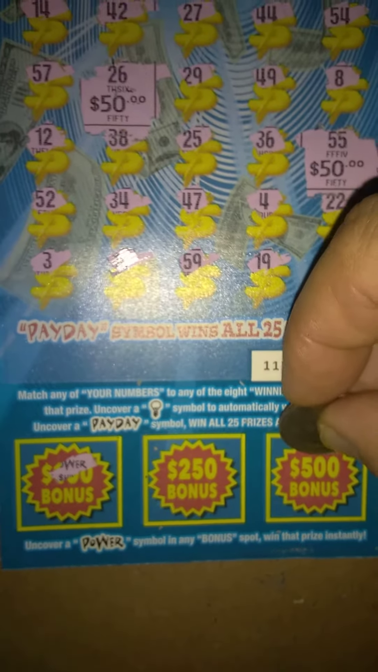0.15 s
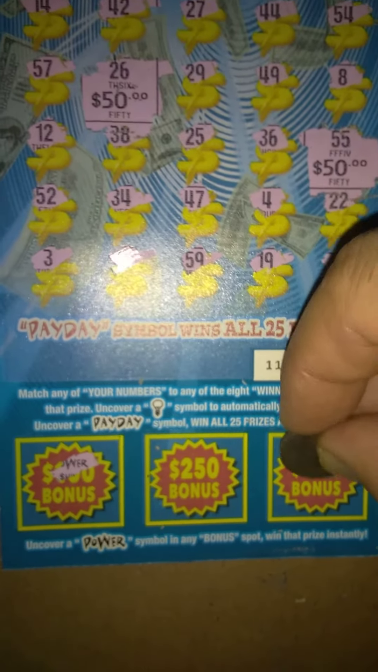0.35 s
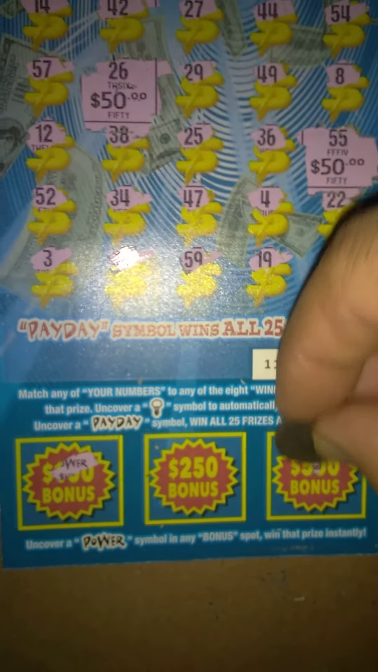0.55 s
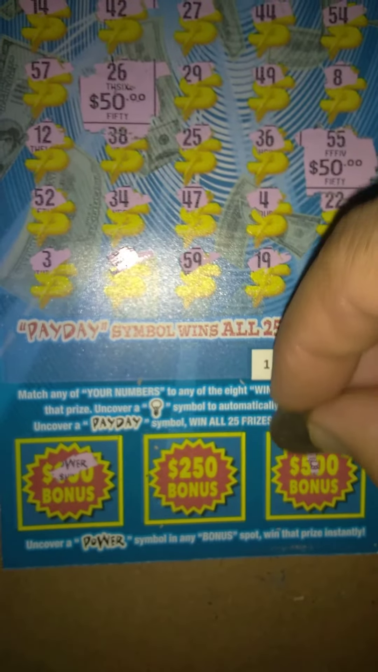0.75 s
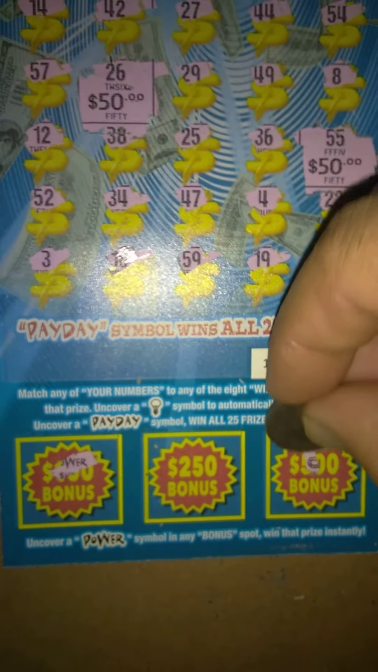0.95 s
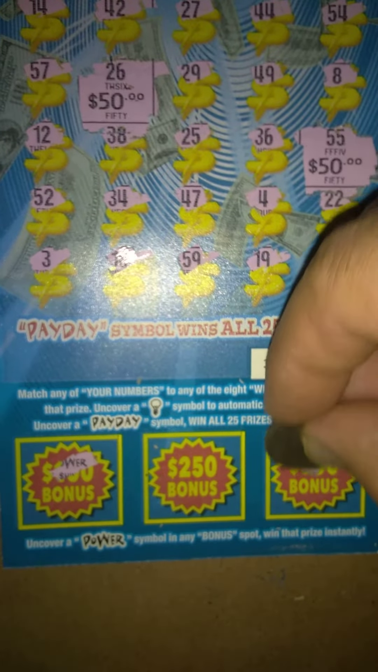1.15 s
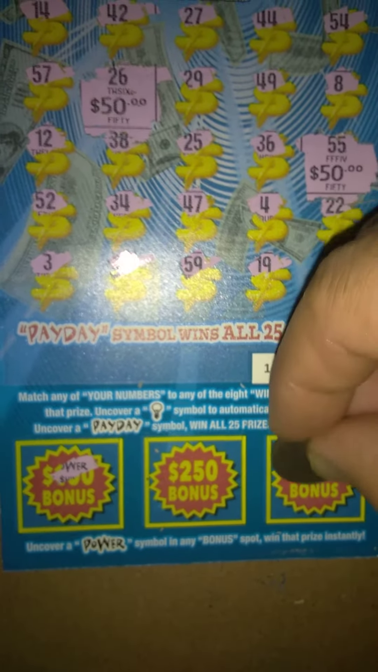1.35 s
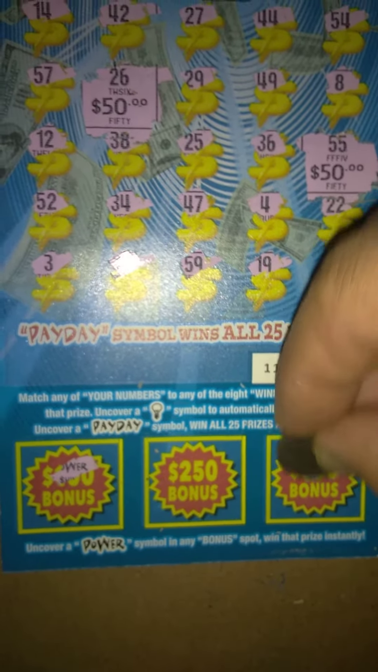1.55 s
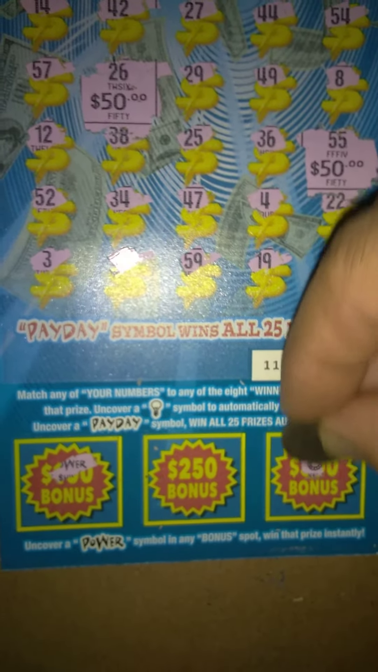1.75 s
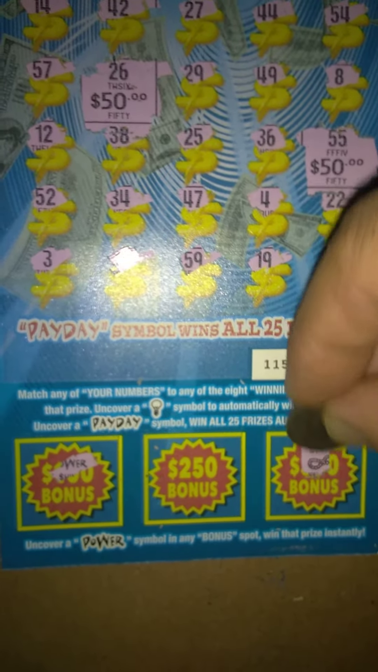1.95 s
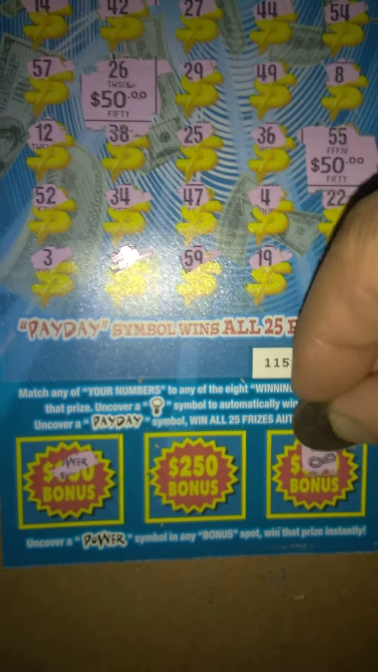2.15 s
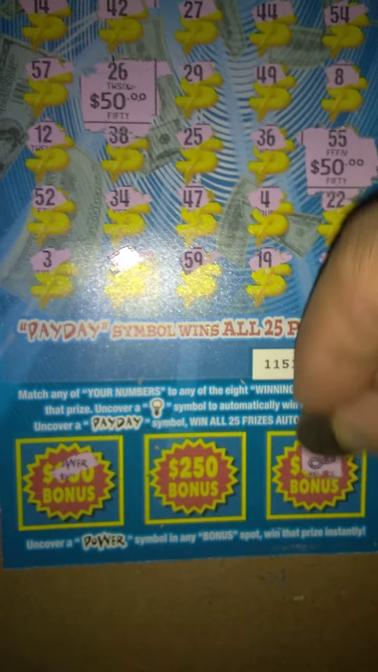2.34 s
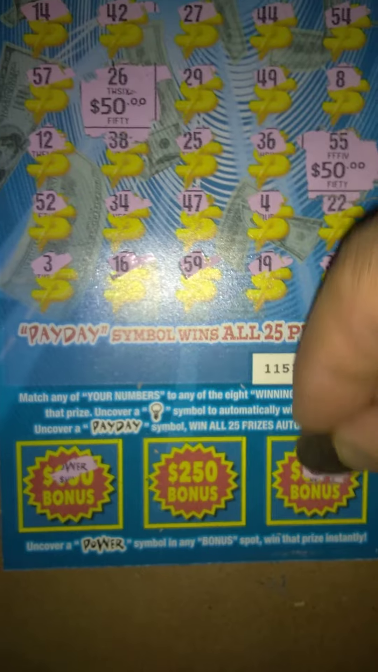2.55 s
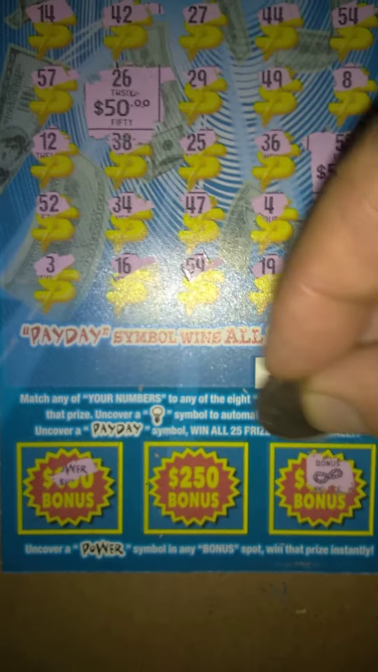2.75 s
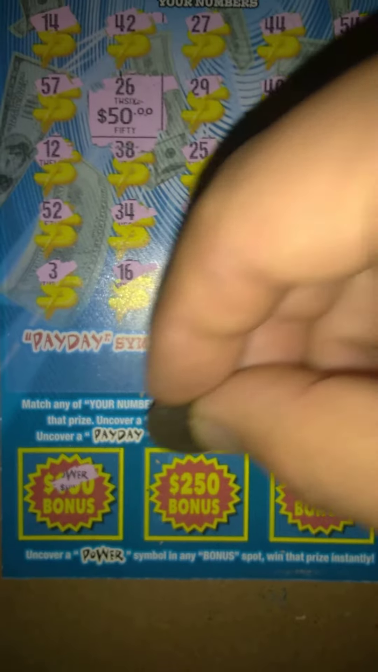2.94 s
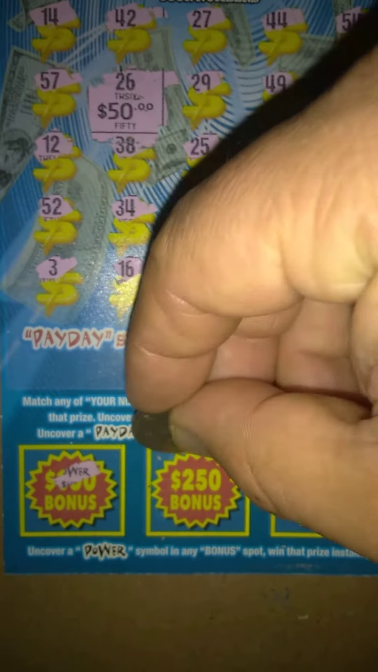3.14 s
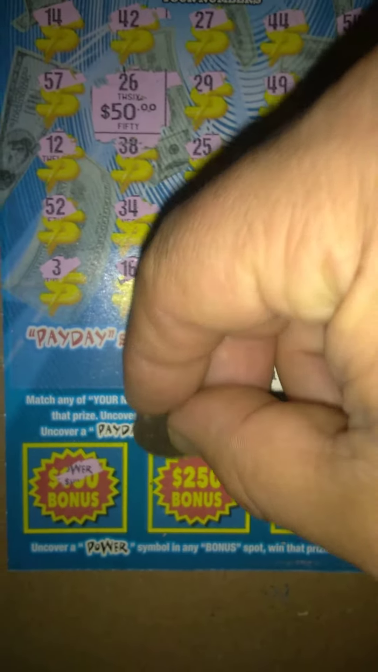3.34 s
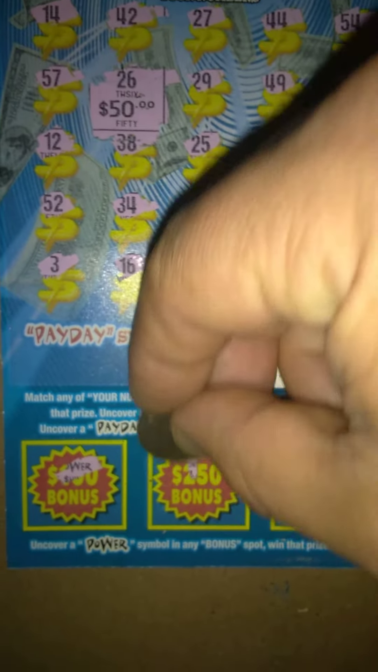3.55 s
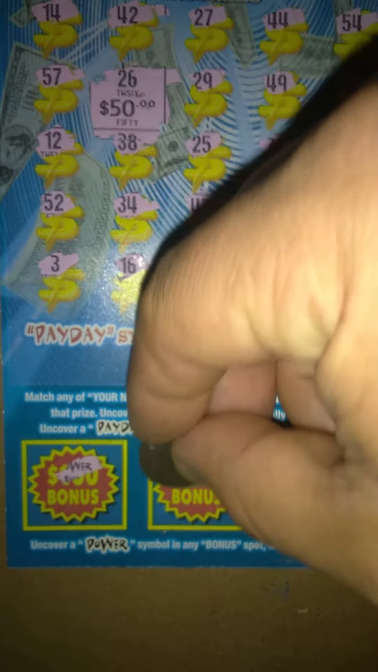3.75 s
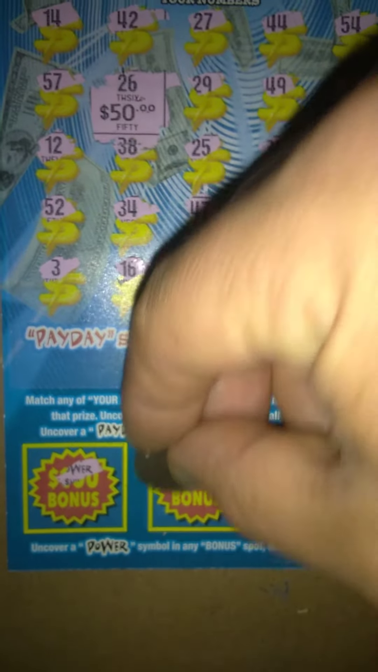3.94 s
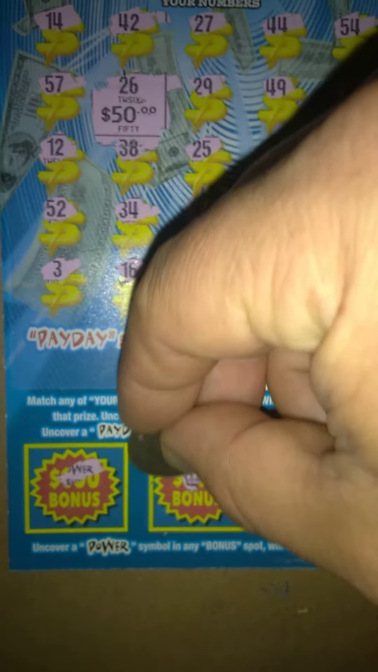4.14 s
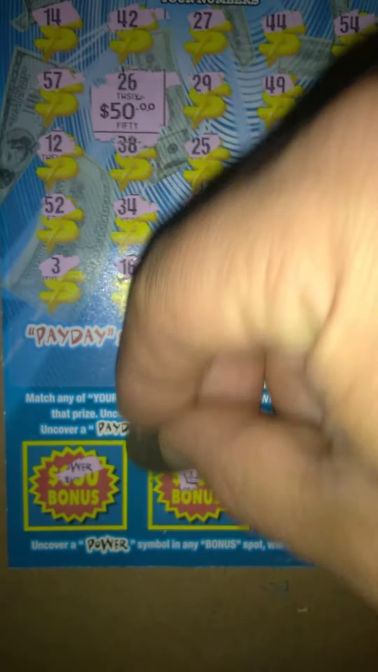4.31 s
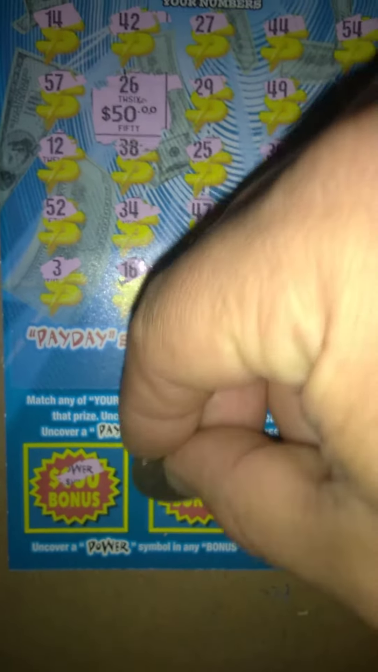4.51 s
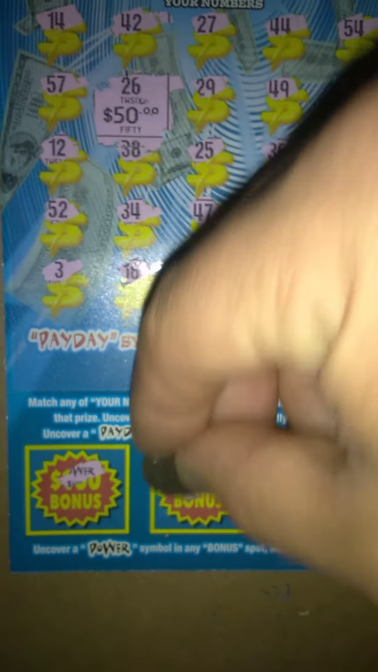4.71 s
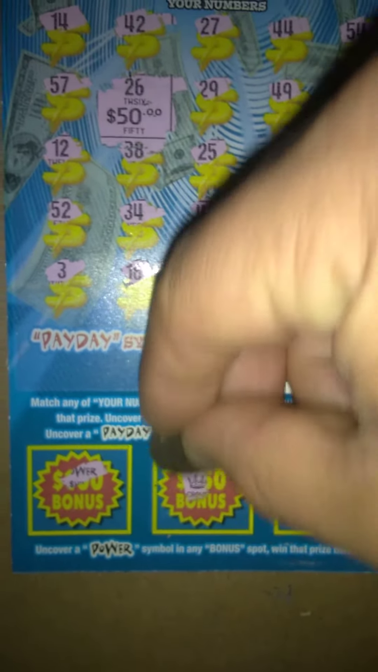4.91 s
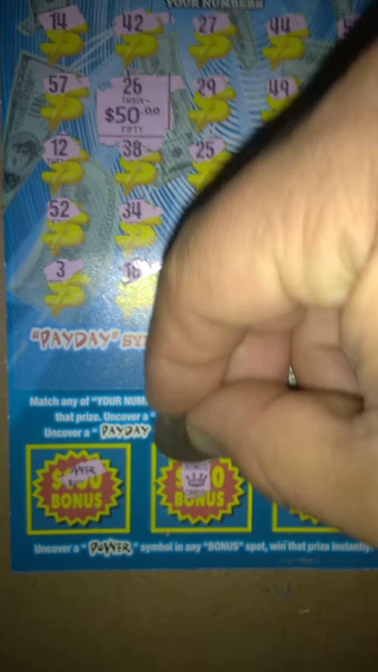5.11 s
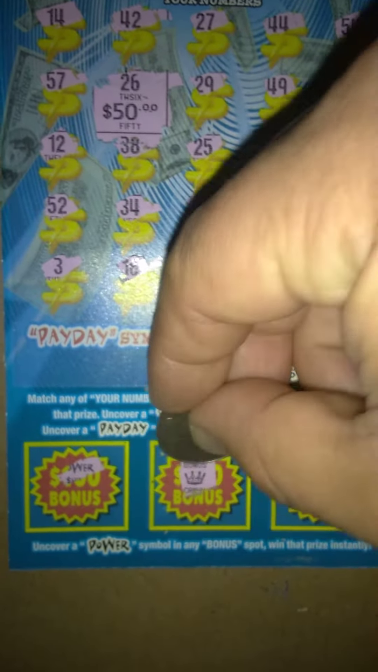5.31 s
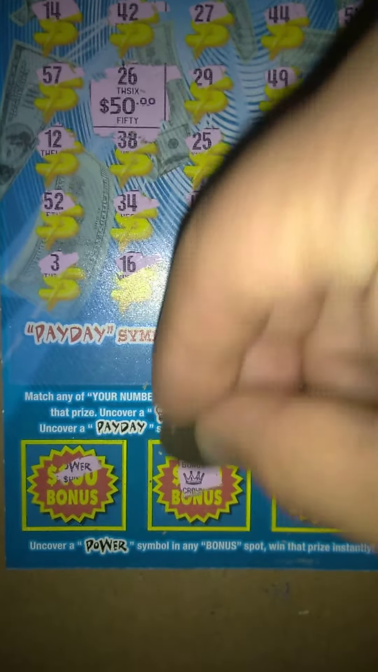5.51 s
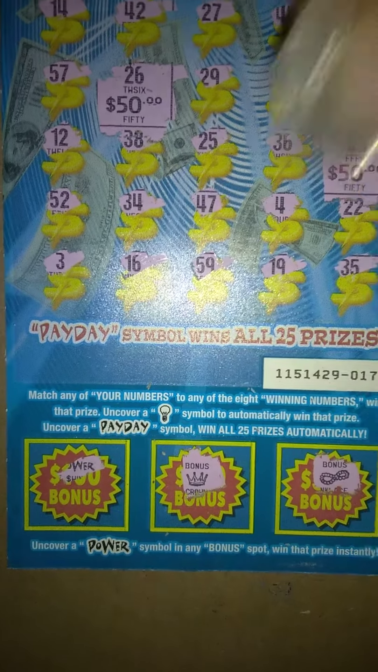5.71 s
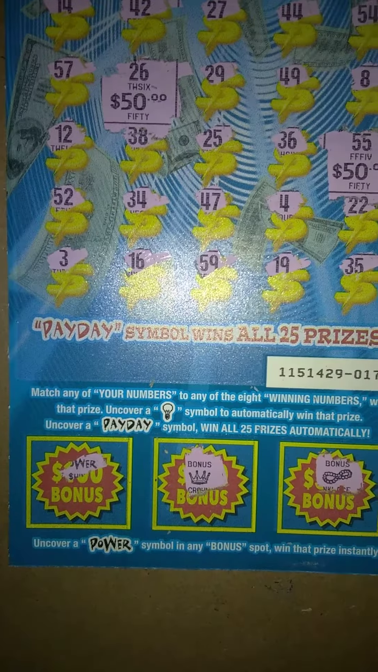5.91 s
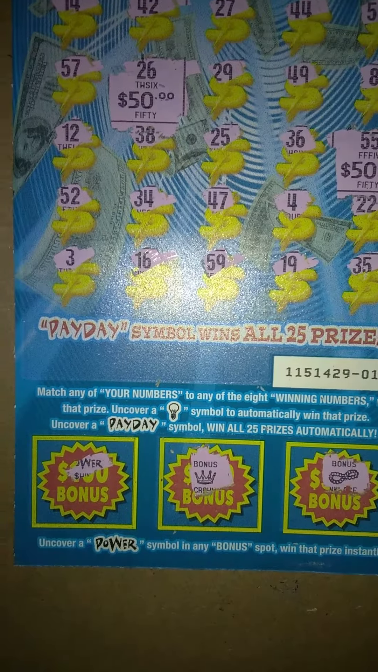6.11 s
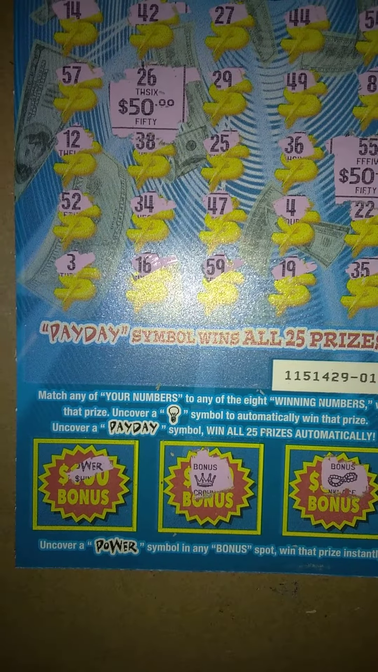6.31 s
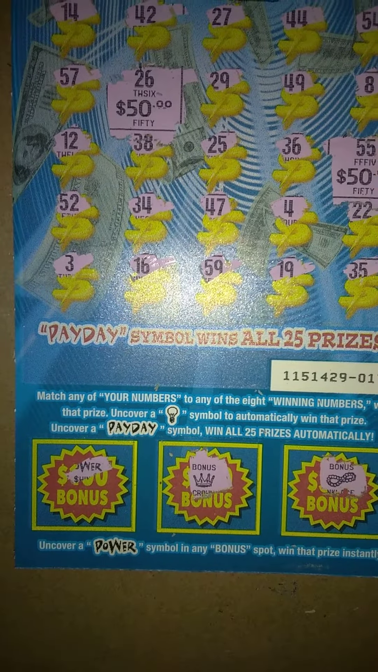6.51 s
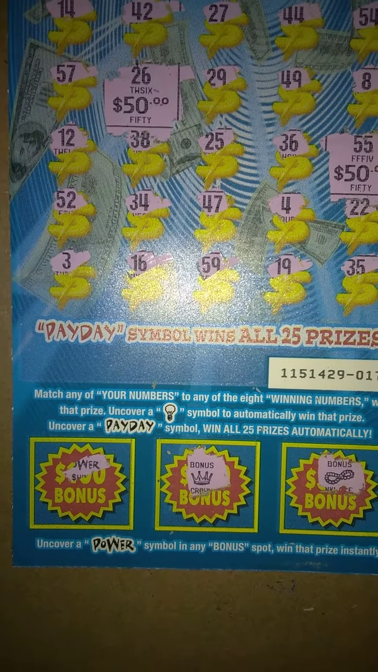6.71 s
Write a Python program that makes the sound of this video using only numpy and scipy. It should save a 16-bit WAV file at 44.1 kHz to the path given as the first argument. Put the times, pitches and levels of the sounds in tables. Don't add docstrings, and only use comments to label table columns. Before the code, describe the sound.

Close-up in a quiet small room, a coin rubs gritty coating from a card on a table. About twenty quick, dry strokes come in a run, alternating duller and brighter, with small knocks. A short pause holds light brushing and handling rumble, then a second run follows, lower and more thumpy. It stops, leaving soft hush. The hand-held phone picks up low grip noise.

```python
import sys
import numpy as np
from scipy import signal
from scipy.fft import rfft, irfft, next_fast_len
from scipy.io import wavfile
from scipy.ndimage import uniform_filter1d

SR = 44100
rng = np.random.default_rng(int(sys.argv[2]) if len(sys.argv) > 2 else 0)


def unload_wav(signal):
    wavfile.write(
        sys.argv[1],
        SR,
        np.round(np.clip(np.atleast_2d(signal).T, -1, 1) * 32767).astype(np.int16),
    )


def volts(x):
    e = np.asarray(x, float) / 20
    return 10 ** e


N = 298370
HZ = np.fft.rfftfreq(next_fast_len(N + 4096), 1 / SR)
PORT_HZ = 2058

# frequency [Hz], width [Hz], level at the right-hand spot [dB],
# level at the middle spot [dB].
CARD_MODES = [(784, 178, 1.5, -10), (1022, 223, 3.5, 15), (1232, 157, -4, -7), (1560, 130, -13, -13),
              (1672, 30, -10, -36)]
# [Hz, Hz, dB, dB].
COIN_MODES = [(2314, 455, 15, 7.5), (2792, 257, 12, 2), (3430, 500, -1, -6.5), (3760, 460, -36, -11.5),
              (4220, 167, 11, 2), (6160, 1400, -14, -39), (7940, 1160, -36.5, -22), (12000, 4000, -40, -47)]


def evened(x):
    return x / np.sqrt(np.mean(x ** 2) + 1e-20)


def read(points, hz, order=1):
    columns = np.transpose(points)
    return np.interp(np.log(hz + 1), np.log(columns[0] + 1), columns[order])


def fader(points):
    return volts(np.interp(np.arange(N) / SR, *np.transpose(points)))


def shaped(x, response):
    size = 2 * len(HZ) - 2
    return irfft(rfft(x, size) * response, size)[..., :N]


def rumble():
    # time in seconds, level in dB.
    grip_path = [(0, -60.5), (2.4, -52), (2.7, -62), (3.4, -60), (3.7, -54.5), (5.4, -60), (6.1, -70),
                 (6.77, -66)]
    # middle in seconds, half length in seconds, level in dB.
    hand_shifts = [
        (.05, .07, -47),
        (.31, .03, -54),
        (.64, .04, -57),
        (1.245, .028, -41),
        (2.36, .03, -50),
        (2.62, .04, -57),
        (3.07, .07, -51),
        (5.56, .03, -52),
        (5.78, .07, -56),
    ]
    slow = rng.standard_normal(N)
    lumps = volts(1.8 * evened(uniform_filter1d(uniform_filter1d(slow, 700), 700)))
    colour_db = read([(25, -25), (45, -5.5), (85, 10.0), (140, -5.5), (230, -19.5), (400, -21.5), (800, -77)], HZ)
    low = evened(shaped(rng.standard_normal((2, N)), volts(colour_db)) * lumps)
    ports = np.array([[1.3, 0], [.55, .35]])
    t = np.arange(N) / SR
    shifts = sum(volts(db) * np.exp(-((t - s) / half) ** 2) for s, half, db in hand_shifts)
    return ports @ low * (fader(grip_path) + shifts)


def air():
    # frequency in Hz, level in dB per Hz, likeness of the ports 0-1.
    hush = [(24.2, -105, 0.98), (52.2, -66.5, 1), (111.6, -81, 0.88), (219, -82, 0.8), (364, -94.5, 0.93),
            (540, -96.5, 0.37), (730, -100, 0.48), (1280, -103, 0.013), (2040, -109, 0.14),
            (4240, -116, 0.18), (7000, -122, 0), (13500, -128, 0)]
    # time in seconds, level in dB.
    breeze_path = [(0, 2), (2.6, 2.5), (3.4, 0.5), (5.6, 3.5), (6.331, 0), (6.4, -2.5), (6.77, -1)]
    a, b = rng.standard_normal((2, N)) * np.sqrt(SR / 2)
    like = np.clip(read(hush, HZ, order=2), 0, 1)
    gain = volts(read(hush, HZ))
    one_port = shaped(a, gain)
    other_port = shaped(a, gain * like) + shaped(b, gain * np.sqrt(1 - like ** 2))
    return np.array([one_port, other_port]) * fader(breeze_path)


def body(modes, order):
    power = sum(volts(2 * m[order]) / (1 + ((HZ ** 2 - m[0] ** 2) / (HZ * m[1] + 1)) ** 2) ** 2 for m in modes)
    fold = irfft(np.log(power + 1e-10) / 2)
    fold[1:len(HZ)] *= 2
    fold[len(HZ):] = 0
    return np.exp(rfft(fold)) / np.sqrt(power.mean())


def ring(force, modes):
    move_s = 3
    first = np.arange(N) < move_s * SR
    right_hand = shaped(force * first, body(modes, order=2))
    middle = shaped(force * ~first, body(modes, order=3))
    return right_hand + middle


def grit(per_s, spread_db, clump_db, clump_s):
    slip = rng.random(N) < per_s / SR
    size = np.minimum(rng.exponential(1, N), 3)
    sign, slow = rng.standard_normal((2, N))
    span = int(clump_s * SR)
    clumps = evened(uniform_filter1d(uniform_filter1d(slow, span), span))
    return evened(slip * sign * volts(spread_db * size + clump_db * clumps))


def scrape():
    # start in seconds,
    # length in seconds, pressure in dB, rasp of speed in dB over it, heaviest moment 0-1.
    first_run = [(0.247, 0.11, -31, -35, 0.49), (0.409, 0.077, -35, -18, 0.47),
                 (0.548, 0.08, -33, -27.5, 0.63), (0.686, 0.063, -36.5, -18, 0.49),
                 (0.812, 0.073, -31, -27, 0.51), (0.968, 0.051, -35.5, -18, 0.56),
                 (1.071, 0.075, -30, -29.5, 0.42), (1.242, 0.036, -41.5, -14.5, 0.52),
                 (1.32, 0.022, -39, -30, 0.1), (1.371, 0.022, -33.5, -25, 0.35),
                 (1.482, 0.018, -30.5, -14, 0.44), (1.544, 0.077, -31, -23, 0.46),
                 (1.672, 0.056, -35.5, -10, 0.61), (1.763, 0.079, -28.5, -27.5, 0.42),
                 (1.891, 0.063, -38.5, -9.5, 0.6), (1.995, 0.072, -31, -21.5, 0.58),
                 (2.125, 0.066, -38, -11.5, 0.48), (2.242, 0.067, -30, -23.5, 0.53),
                 (2.35, 0.069, -41, -11.5, 0.64), (2.46, 0.067, -30.5, -25.5, 0.45)]
    second_run = [(3.403, 0.1, -31, -27, 0.48), (3.576, 0.067, -32.5, -20.5, 0.49),
                  (3.714, 0.06, -31.5, -27.5, 0.61), (3.823, 0.088, -53, -20, 0.26),
                  (3.88, 0.021, -32.5, -24, 0.75), (3.959, 0.079, -34, -18, 0.43),
                  (4.087, 0.071, -32, -22, 0.4), (4.214, 0.077, -29.5, -29, 0.61),
                  (4.371, 0.048, -31.5, -17.5, 0.53), (4.462, 0.07, -44, -19.5, 0.26),
                  (4.523, 0.024, -26, -46, 0.28), (4.58, 0.09, -54.5, -12, 0.46),
                  (4.657, 0.017, -35, -52, 0.27), (4.713, 0.07, -30.5, -20, 0.62),
                  (4.817, 0.081, -38.5, -15, 0.77), (4.935, 0.087, -30, -23.5, 0.46),
                  (5.054, 0.08, -37.5, -13.5, 0.76), (5.164, 0.086, -30, -20.5, 0.49),
                  (5.278, 0.083, -36.5, -17.5, 0.58), (5.392, 0.072, -30.5, -20.5, 0.53)]
    # [s, s, dB, dB, 0-1].
    touches = [
        (1.34, 0.042, -48, -24, .35),
        (2.529, 0.014, -48, -32, 0.5),
        (2.995, 0.048, -56, -14, 0.54),
        (3.06, 0.028, -66, -29, .5),
        (3.56, .015, -50, -34, .5),
        (4.266, 0.017, -31, -44, 0.04),
        (4.347, 0.041, -50.5, -14, 0.45),
        (5.192, 0.012, -33, -41, .5),
    ]
    # time in seconds, level in dB.
    drag_path = [(0, -62), (.28, -56), (.7, -53), (1.2, -52.5), (1.9, -51), (2.4, -53), (2.62, -62),
                 (2.95, -58.5), (3.03, -61), (3.15, -59.5), (3.45, -57.5), (3.7, -51), (4.1, -61),
                 (4.4, -54), (5.1, -57), (5.47, -59), (6.37, -61.5), (6.77, -80)]
    # frequency in Hz, width in Hz, dB at the right-hand spot, dB at the middle.
    table_modes = [(120, 105, -6, -6.5), (198, 82, -1, 2.5), (334, 238, 3, 3.5), (557.3, 131, -4, 3.5)]
    build_db = [4.5, -5, -4.5]
    arch = [0.16, 0.47, 0.9]
    abrupt_stop = [1.5, 1.3, 1.03]
    lean_db = 68
    trail_db, trail_s = -22.5, 0.018

    level = np.zeros((3, N))
    for s, length, press_db, rasp_db, late in first_run + second_run + touches:
        on = slice(int(s * SR), int((s + length) * SR))
        u = (np.arange(N)[on] / SR - s) / length
        thrum = press_db - 6
        rasp = thrum + rasp_db
        flex = 16.5 + 0.7 * thrum + 0.48 * rasp
        for k, db in enumerate((thrum, flex, rasp)):
            rise_db = build_db[k] + lean_db * (late - .5)
            turns = abs(np.sin(np.pi * abs(u) ** abrupt_stop[k])) ** arch[k]
            level[k, on] += volts(db) * evened(volts(rise_db * u) * turns)
    level = uniform_filter1d(level, size=200, axis=1)
    decay = np.exp(-1 / (trail_s * SR))
    level += volts(trail_db) * signal.lfilter([1 - decay], [1, -decay], level)
    level += fader(drag_path) * volts([[-4.2], [-12.], [-28.]])

    coarse = grit(per_s=3500, spread_db=2.84, clump_db=1.9, clump_s=0.0041)
    fine = grit(per_s=9000, spread_db=3.53, clump_db=1.68, clump_s=0.0062)
    table = volts(-2.02) * ring(level[0] * coarse, table_modes)
    card = volts(-0.82) * ring(level[1] * (0.48 * coarse + 0.97 * fine), CARD_MODES)
    coin = volts(4.0) * ring(level[2] * (0.29 * coarse + 1.0 * fine), COIN_MODES)
    return table + card + coin


def room(x):
    t = np.arange(8000) / SR
    tail = rng.standard_normal((2, len(t))) * volts(-60 * t / 0.076) * (t > .003)
    wet = signal.fftconvolve(x[None], tail / np.linalg.norm(tail[0]), axes=1)[:, :N]
    return shaped(wet, volts(read([(300, -19.5), (1200, -22.5), (3000, -18.0), (8000, -4.5)], HZ)))


def knocks():
    # time in seconds, peak in dB,
    # crack in dB over it, push 1 or pull -1.
    first_knocks = [(.672, -46, -7, 1), (1.062, -34.5, -25, -1), (1.203, -42, -12, 1),
                    (1.228, -49.5, 2.5, 1), (1.258, -33.5, -2.5, 1), (1.319, -30, -19, 1),
                    (1.378, -29, -22, -1), (1.431, -37, -17, 1), (1.483, -36, -6, 1), (1.538, -51, -7, 1),
                    (1.682, -42, -6, 1), (2.238, -34, -17, 1), (2.459, -33.5, -13, -1),
                    (2.568, -43.5, -10, 1), (2.61, -53, -4, 1), (2.987, -49, -4, 1)]
    second_knocks = [(3.698, -29.5, -36, 1), (3.824, -30, -28, -1), (3.946, -27, -23, 1),
                     (4.083, -29.5, -40, -1), (4.22, -32, -21, -1), (4.338, -31, -17.5, -1),
                     (4.462, -33, -20, -1), (4.524, -34.5, -5, 1), (4.581, -36.5, -17, -1),
                     (4.655, -29.5, -9, 1), (4.702, -26.5, -22, 1), (4.937, -24, -31, 1),
                     (5.163, -32, -33, 1), (5.192, -34, -30, 1), (5.388, -28.5, -32, -1),
                     (5.544, -44.5, -2.5, -1), (5.78, -46.5, -6, 1)]
    thud_hz, contact_s, thud_s, rise_s = 287, .0007, .003, .0003

    t = np.arange(900) / SR
    swing = np.sin(2 * np.pi * thud_hz * (t + contact_s * (1 - np.exp(-t / contact_s))))
    shape = np.exp(-(t / thud_s) ** 2) * (1 - np.exp(-t / rise_s))
    thud, tick = np.zeros((2, N))
    for s, db, crack_db, way in first_knocks + second_knocks:
        at = round(s * SR)
        thud[at:at + len(t)] += way * volts(db + 0.5) * swing * shape
        tick[at + 8] += way * volts(db + crack_db)
    return thud + volts(22.5) * ring(tick, CARD_MODES) + volts(10.0) * ring(tick, COIN_MODES)


def scene():
    # frequency in Hz, level in dB, radians ahead of the port delay.
    case_path = [(60, 5, -0.16), (130, 0.3, .03), (199, -1, 0.14), (397, -2, 0.35), (910, -4, 0.9),
                 (1490, -16.5, 0.82), (2300, -8, -0.28), (3400, -9.5, -0.13), (7000, -2, 0.14)]
    near = scrape() + knocks()
    phase = read(case_path, HZ, order=2) - 2 * np.pi * HZ / PORT_HZ
    far = shaped(near, volts(read(case_path, HZ)) * np.exp(1j * phase))
    return np.array([far, near]) + rumble() + room(near) + air()


def band_limit(x):
    return signal.sosfilt(signal.butter(12, 13900, fs=SR, output="sos"), x)


def record(dry):
    # frequency in Hz, level in dB per Hz.
    hiss_colour = [(1000, -124), (2000, -123), (4000, -119), (6000, -119.5), (8500, -120.5), (14000, -126)]
    steered = dry - shaped(dry[::-1], np.exp(-2j * np.pi * HZ / PORT_HZ))
    hiss = shaped(rng.standard_normal((2, N)) * np.sqrt(SR / 2), volts(read(hiss_colour, HZ)))
    return band_limit(steered + hiss)


dry = scene()
out = record(dry)
unload_wav(out)
```